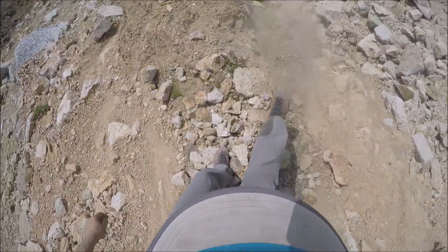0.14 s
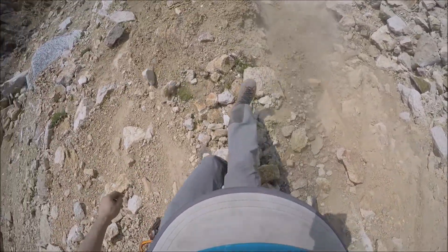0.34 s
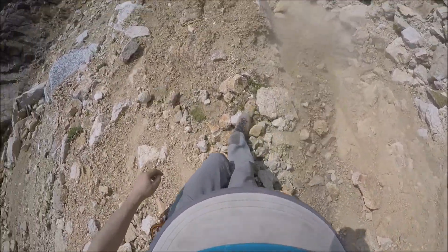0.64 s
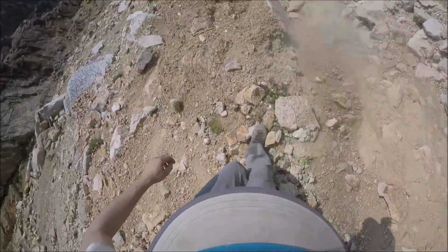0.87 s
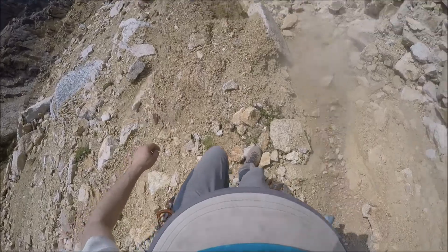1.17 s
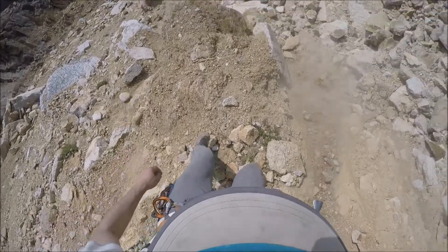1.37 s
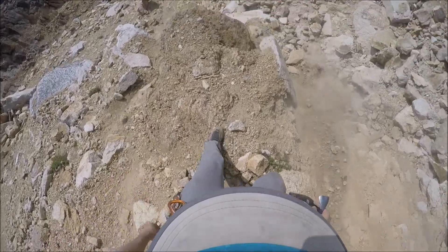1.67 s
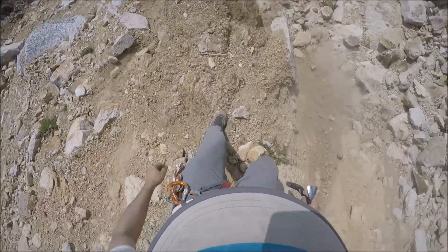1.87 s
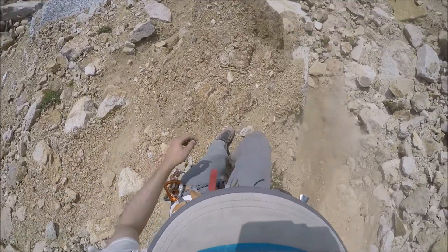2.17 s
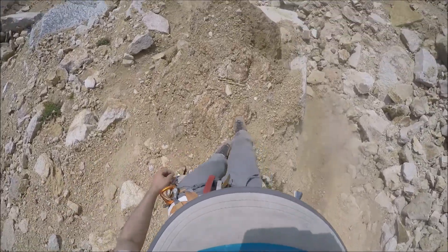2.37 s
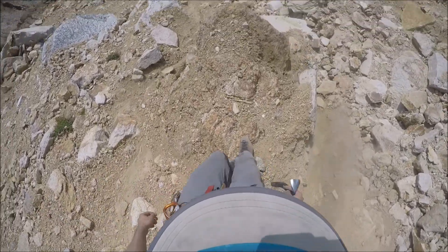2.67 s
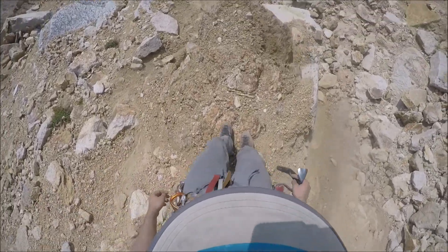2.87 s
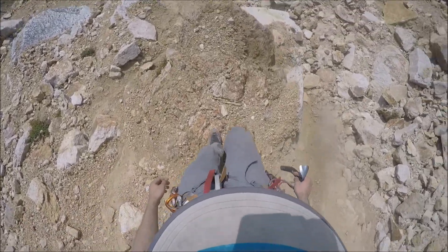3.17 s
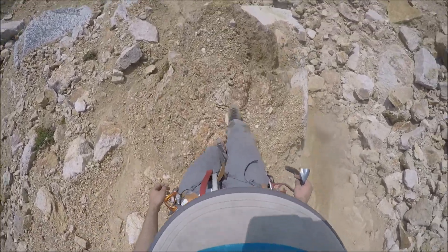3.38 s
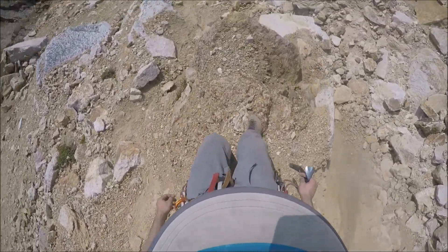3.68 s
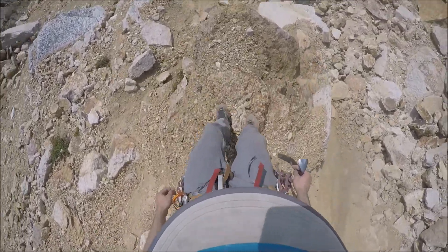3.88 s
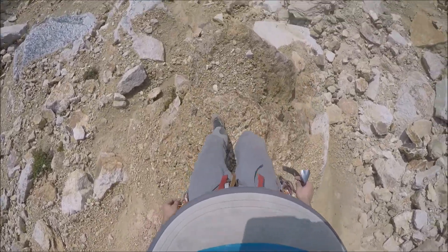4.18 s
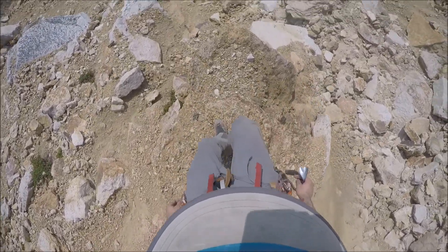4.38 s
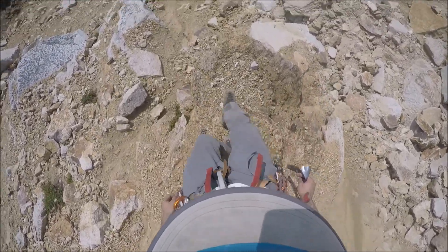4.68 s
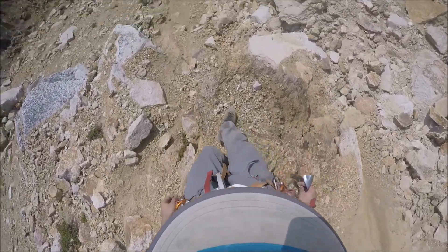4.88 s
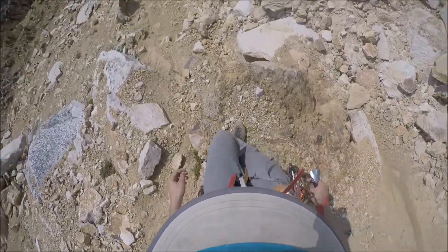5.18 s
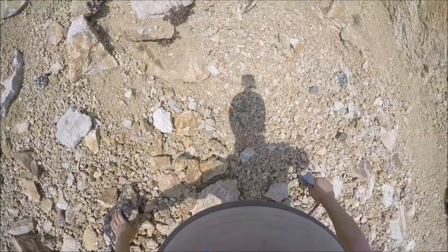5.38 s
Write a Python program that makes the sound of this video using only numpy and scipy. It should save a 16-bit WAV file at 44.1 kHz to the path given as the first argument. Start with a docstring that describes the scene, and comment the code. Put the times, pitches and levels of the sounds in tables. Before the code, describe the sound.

Loose stones rattle and skid under boots heading downhill, thinning to a soft trickle of grit amid low bumps and wind.

```python
"""On a steep slope of loose gravel, boots step and slide downhill.
Stones run, clack and skid under the soles, then settle into a thin trickle of grit as the ground
turns to soft dirt. It is all heard by a camera in a plastic case worn on the body:
heavy steps jolt it with dull thuds, and moving air rumbles on the case."""
import sys
import numpy as np
from scipy import signal
from scipy.fft import rfft, irfft
from scipy.io import wavfile
from scipy.ndimage import uniform_filter1d

SR = 44100
rng = np.random.default_rng(int(sys.argv[2]) if len(sys.argv) > 2 else 0)


def dump(signal):
    """Clip the signal to [-1, 1] and save it as 16-bit WAV at the path in sys.argv[1]."""
    limited = np.clip(np.atleast_2d(signal).T, -1, 1)
    pcm = np.round(limited * 32767).astype(np.int16)
    wavfile.write(sys.argv[1], SR, pcm)


N = 244302
TIME = np.arange(N) / SR


def from_db(db):
    return 10 ** (np.asarray(db) / 20)


def rms_one(x):
    """Scale a sound to an average (rms) level of 1."""
    return x / np.sqrt(np.mean(x ** 2) + 1e-20)


def peak_one(x):
    """Scale a hit so that its loudest 3 ms have level 1."""
    return x / np.sqrt(uniform_filter1d(x ** 2, SR * 3 // 1000).max())


def add(out, start_s, sound):
    """Mix a sound in at start_s."""
    start = int(np.clip(round(start_s * SR), 0, N - 1))
    out[start:start + len(sound)] += sound[:N - start]


def swell(peak_s, half_length_s):
    """A smooth rise to 1 and back."""
    return np.exp(-((TIME - peak_s) / half_length_s) ** 2 / 2)


def coloured(x, tone):
    """Shape a sound with a table of pitches and levels, fading beyond its ends; level 1."""
    hz, db = np.transpose(tone)
    log_hz = np.log(np.maximum(np.arange(N // 2 + 1) * SR / N, 1))
    outside = np.maximum(np.log(hz[0]) - log_hz, 0) + np.maximum(log_hz - np.log(hz[-1]), 0)
    gain = from_db(np.interp(log_hz, np.log(hz), db) - 29 * outside)
    return rms_one(irfft(rfft(x) * gain, N))


def filtered(x, order, hz, kind="band"):
    """Keep a band of pitches, or only the low ones."""
    return signal.sosfilt(signal.butter(order, hz, kind, fs=SR, output="sos"), x)


def resonance(x, hz, width_hz):
    """Ring at one pitch; the narrower the width, the longer the ring."""
    r = np.exp(-np.pi * width_hz / SR)
    feedback = [1, -2 * r * np.cos(2 * np.pi * hz / SR), r * r]
    return signal.lfilter((1 - r * r) / 2 * np.array([1, 0, -1]), feedback, x + 1e-18)


def hiss(db=0):
    """Smooth noise, like countless tiny hits blurred together."""
    return from_db(db) * rng.standard_normal(N)


def grains(per_s, spread_db, q, low_hz, high_hz, count=24):
    """Pebbles collide at random, mostly weakly, each at its own pitch; a higher q rings longer."""
    sizes = from_db(spread_db * np.minimum(rng.exponential(1, N), 4)) * rng.choice([-1, 1], N)
    clicks = sizes * (rng.random(N) < per_s / SR)
    pebble = rng.integers(0, count, N)
    pitches = np.geomspace(low_hz, min(high_hz, SR / 2), count)
    rings = sum(resonance(clicks * (pebble == k), hz, hz / q) for k, hz in enumerate(pitches))
    return rms_one(rings / np.sqrt(per_s))


def coarseness(first_share=.79, dirt_from_s=3.14, blend_s=.082):
    """The share of the ground that is coarse stones; it gives way to soft dirt."""
    return first_share / (1 + np.exp((TIME - dirt_from_s) / blend_s))


# The tone of running stones and of running dirt: pitch_hz, level_db
STONE_TONE = [(700, -9.5), (1100, -5.5), (1600, -11), (2350, -2), (2900, -5.5), (3800, -3), (4600, -14),
              (6500, -12.5), (7500, -36)]
DIRT_TONE = [(700, -8), (1000, -6), (1600, -14.5), (2100, -4), (2400, -3.5), (2800, 0), (3700, -3.5),
             (4500, -11.5), (6600, -15.5), (8000, -14.5)]
def rattle(hits_per_s, coarse):
    """Near pebbles and crumbs of dirt rattle over the smooth wash of far ones."""
    pebbles = grains(1.1 * hits_per_s, spread_db=4, q=6, low_hz=1072, high_hz=7320) + hiss(-1)
    crumbs = grains(4 * hits_per_s, spread_db=4.5, q=2.5, low_hz=1730, high_hz=8200) + hiss(6)
    stony = np.sqrt(coarse) * coloured(pebbles, STONE_TONE)
    return stony + np.sqrt(1 - coarse) * coloured(crumbs, DIRT_TONE)


# The tone of crushed ground: pitch_hz, level_db
CRUNCH_TONE = [(150, 12), (300, 6), (550, 1), (850, -7.5), (1150, -8.5), (1600, -6.5), (2400, -10)]
# Weight comes onto a boot (wind uses this too): peak_s, half_length_s, crunch_db, air_db
FOOTSTEPS = [(0.6, 0.12, -56, -68), (0.89, 0.2, -75, -36), (1.346, 0.046, -54, -51),
             (1.733, 0.22, -56.5, -33.5), (2.866, 0.022, -54, -33.5), (3.16, 0.13, -54.5, -35),
             (3.665, 0.09, -57.5, -33), (4.222, 0.13, -63, -37.5), (5.04, 0.32, -58.5, -36)]
def crunch(hits_per_s, coarse, flow_db):
    """Coarse stones crack under the sole; soft dirt only rustles."""
    trodden = sum(from_db(db) * swell(s, half) for s, half, db, _ in FOOTSTEPS)
    level = np.hypot(from_db(-59.5 + .26 * flow_db), trodden)
    cracks = grains(hits_per_s / 2, spread_db=6.5, q=2.4, low_hz=241, high_hz=1820)
    return level * coloured(coarse * cracks + hiss(7), CRUNCH_TONE)


# The tone of sliding sand: pitch_hz, level_db
SAND_TONE = [(3000, -24), (4700, -15), (7600, -2.5), (9200, -6.5), (10200, -6), (12000, -6), (14000, -10),
             (15300, -9)]
# Narrow peaks and a dip in its hiss: pitch_hz, width_hz, boost_db
SAND_BANDS = [(5080, 130, 12), (5380, 150, 12), (6560, 380, 9), (7750, 500, -5), (8420, 250, 3)]
def sand(hits_per_s, flow_db):
    """Fine grit hisses, louder when more gravel runs."""
    grit = grains(4 * hits_per_s, spread_db=4, q=2.7, low_hz=4000, high_hz=13900) + hiss(2)
    for hz, width_hz, db in SAND_BANDS:
        grit = grit + (from_db(db) - 1) * resonance(grit, hz, width_hz)
    return from_db(-57.5 + .54 * flow_db) * coloured(grit, SAND_TONE)


# How loudly the gravel runs (tumbling uses this too): time_s, level_db
GRAVEL_FLOW = [(0, -45.5), (.28, -43), (.55, -47.5), (.78, -49.5), (1.15, -50), (1.78, -49), (2.08, -53),
               (2.85, -56), (3.4, -59), (4.1, -61), (4.75, -59), (5.4, -62)]
def gravel(full_flow_db=-45, surge_db=1.99, surges_per_s=50):
    """The ground slides in small surges that lift rattle, crunch and sand together."""
    rattle_db = np.interp(TIME, *np.transpose(GRAVEL_FLOW))
    flow_db = rattle_db - full_flow_db
    hits_per_s = 2000 * from_db(.75 * flow_db)
    coarse = coarseness()
    wander = rms_one(np.interp(TIME * surges_per_s, np.arange(4096), rng.standard_normal(4096)))
    surge = from_db(surge_db * (.5 + .5 * coarse) * wander)
    running = from_db(rattle_db) * rattle(hits_per_s, coarse)
    return surge * (running + crunch(hits_per_s, coarse, flow_db) + sand(hits_per_s, flow_db))


# The tone of air swirling on the case: pitch_hz, level_db
WIND_TONE = [(16, 7), (28, 2.5), (50, 0), (80, -6.5), (120, -14.5), (190, -23.5), (400, -39.5)]
def wind(breeze_db=-40):
    """Air rumbles on the case: a light breeze, and a puff with every step."""
    puffs = sum(from_db(db) * swell(s, half) for s, half, _, db in FOOTSTEPS)
    swirls = coloured(hiss(), WIND_TONE)
    strength = np.sqrt(uniform_filter1d(swirls ** 2, size=SR // 5))
    return np.hypot(from_db(breeze_db), puffs) * swirls / strength


def hit(low_hz, high_hz, fade_s, chatter, ring, rebound, snap=0, bounces=1, count=7):
    """A hit and its bounces ring a stone: size sets the lowest pitch, hardness the highest."""
    t = np.arange(SR // 10) / SR
    force = chatter * rng.standard_normal(len(t)) * from_db(-60 * t / fade_s)
    force[0] += 1
    for k in range(bounces):
        bounce_s = .003 + .019 * (k + rng.random()) / bounces
        force[int(bounce_s * SR)] += rebound * rng.uniform(-1.2, 1.2)
    high_hz = max(high_hz, 1.2 * low_hz)
    crack = filtered(force, 2, (low_hz, high_hz))
    # an uneven stone rings at unevenly spaced pitches, muffled by the ground
    pitches = low_hz + (high_hz - low_hz) * (np.arange(count) + rng.random(count)) / count
    rings = sum(rng.choice([-1, 1]) * rng.uniform(.5, 1) * resonance(force, hz, width_hz=170)
                for hz in pitches)
    stone = filtered(rms_one(crack) + ring * rms_one(rings), 2, min(2 * high_hz, SR / 3), "low")
    # grit caught between the stones snaps
    grit = rms_one(filtered(force, 4, hz=(700, 5200)))
    return peak_one(stone + snap * grit)


def clear_ring(hz, fade_s=.022, contact_s=.0005):
    """A short clear ring set off by a stone's hit, often the case's own note."""
    t = np.arange(SR // 10) / SR
    note = np.sin(2 * np.pi * (hz * t + rng.random()))
    return peak_one(note * from_db(-60 * t / fade_s) * np.minimum(t / contact_s, 1))


# Larger stones hit each other: start_s, level_db, low_hz, high_hz, ring_hz
STONE_HITS = [(.005, -37, 1000, 1600, 1200), (.033, -38, 2000, 3600, 2400), (.1262, -26, 1900, 2650, 2340),
              (.142, -35, 2100, 3000, 2360), (.185, -36.5, 2230, 3300, 2360),
              (.1974, -36.5, 2150, 3700, 2400), (.224, -41, 800, 1300, 1000),
              (.2315, -39, 3100, 5200, 3650), (.2594, -38, 2700, 4500, 3100),
              (.2654, -39, 3100, 5200, 3800), (.315, -29.5, 2100, 3200, 2380),
              (.3614, -38, 2200, 3900, 2950), (.4274, -38, 2150, 2600, 2360), (.531, -36, 2000, 2800, 2330),
              (.5511, -39, 2800, 4600, 3600), (.6794, -38, 2200, 3500, 2900),
              (.7861, -44, 1400, 2800, 2330), (.836, -41, 1900, 3600, 3600), (.85, -36, 1200, 2700, 2340),
              (.877, -42, 1900, 3800, 2380), (.972, -35, 2350, 3700, 2270), (1.0241, -39, 2200, 3500, 2310),
              (1.0604, -35, 2400, 3800, 3600), (1.0953, -36, 2300, 4000, 3630),
              (1.294, -35.5, 2360, 4500, 3300), (1.331, -37, 2200, 3200, 2360),
              (1.363, -32.5, 1300, 2600, 2360), (1.3917, -42.5, 1200, 3000, 1510),
              (1.423, -31, 1900, 3750, 3250), (1.4364, -41, 1900, 3100, 2500),
              (1.4454, -40, 1750, 2700, 1830), (1.533, -37, 2230, 4000, 2630),
              (1.6067, -40, 2500, 3900, 2920), (1.7267, -35.5, 1770, 3570, 3150),
              (2.143, -40, 1400, 2600, 1930), (2.269, -35, 1050, 2600, 1720),
              (2.2735, -37, 1140, 3300, 1200), (2.2825, -33, 1400, 2900, 2370),
              (2.33, -38, 1300, 2400, 1540), (2.4261, -33, 1200, 3000, 2380),
              (2.4583, -44, 1900, 3800, 1830), (2.5975, -36, 1050, 2800, 1205),
              (2.6738, -45.5, 1500, 3400, 2570), (2.729, -43.5, 1400, 3900, 2370),
              (2.7586, -37, 1700, 2650, 2370), (2.827, -41.5, 1400, 3770, 2890),
              (2.864, -43.5, 1100, 3100, 1205), (2.9607, -48, 2600, 3700, 3200),
              (2.9841, -45.5, 2400, 3700, 3130), (3.1618, -45, 1000, 2600, 1080),
              (3.1753, -39.5, 2300, 4500, 2930), (3.2256, -47.5, 2200, 3500, 3210),
              (3.458, -48, 2400, 6200, 3810), (3.8798, -46.5, 950, 2800, 2670),
              (4.603, -52, 2800, 6000, 2990), (4.7351, -47, 2500, 3400, 2550),
              (4.7742, -43, 2370, 4000, 3430)]
def clacks(boost_db=.2, equal_db=-16):
    """Stones crack together and set off a short ring, often in the case; harder hits ring more."""
    out = np.zeros(N)
    for start_s, db, low_hz, high_hz, ring_hz in STONE_HITS:
        crack = hit(low_hz, high_hz, fade_s=.019, chatter=.17, ring=.4, rebound=.45, snap=.25, bounces=2)
        note = from_db(.4 * (db - equal_db)) * clear_ring(ring_hz)  # as loud as the crack at equal_db
        add(out, start_s, from_db(db + boost_db) * peak_one(crack + note))
    return out


# The tone of the case rubbing its strap: pitch_hz, level_db
STRAP_TONE = [(60, -7), (150, -38), (300, -28)]
# Jolts of the body: peak_s, level_db, pitch_hz
JOLTS = [(0.026, -31.5, 80.4), (1.637, -39, 111), (1.751, -19.5, 52.3), (1.832, -24.5, 37),
         (1.859, -21.5, 112), (2.422, -31.5, 79), (2.566, -25, 43.5), (3.093, -23, 56), (3.155, -22.5, 28),
         (3.204, -30.5, 73.6), (3.661, -17.5, 53.7), (4.238, -19, 23.6), (4.355, -21.5, 89),
         (5.005, -24, 42)]
def thuds(half_length_cycles=.675, slowing=.284, rub_db=-31):
    """Each jolt sways the case for a cycle or two, slowing as it goes, and rubs it on its strap."""
    out = np.zeros(N)
    rub = from_db(rub_db) * coloured(hiss(), STRAP_TONE)
    for peak_s, db, hz in JOLTS:
        from_peak = (TIME - peak_s) * hz / half_length_cycles
        near = np.abs(from_peak) < 5
        from_peak = from_peak[near]
        turns = np.cumsum(hz * (1 - slowing * np.tanh(from_peak))) / SR + rng.random()
        sway = np.exp(-from_peak ** 2 / 2) * np.sin(2 * np.pi * turns)
        out[near] += from_db(db) * (sway + np.exp(-from_peak ** 2 / 5) * rub[near])
    return out


def tumbling(count=26, low_hz=1600, high_hz=3400, spread_db=3):
    """Small loose stones tick at random, more often and harder the more gravel runs."""
    out = np.zeros(N)
    rattle_db = np.interp(TIME, *np.transpose(GRAVEL_FLOW))
    slid_so_far = np.cumsum(from_db(rattle_db / 2) * coarseness())
    for k, (when, pitch, force) in enumerate(rng.random((count, 3))):
        at = min(np.searchsorted(slid_so_far, slid_so_far[-1] * (k + when) / count), N - 1)
        hz = low_hz * (high_hz / low_hz) ** pitch
        tick = hit(hz / 2 ** .5, hz * 2 ** .5, fade_s=.016, chatter=.14, ring=.5, rebound=.35)
        add(out, at / SR, from_db(rattle_db[at] - 1 + spread_db * force) * tick)
    return out


# A boot strikes a big rock: start_s, level_db, low_hz, high_hz, sole_db
ROCK_HITS = [(0.1181, -26, 480, 870, -36.5), (1.007, -39, 330, 1060, -40.5),
             (1.341, -39.5, 514, 1250, -44.5), (1.849, -32, 850, 2980, -34.5), (2.052, -44, 480, 1160, -57),
             (2.082, -42.5, 935, 1630, -50), (2.214, -33, 540, 1590, -38.5),
             (2.4039, -38.5, 483, 2440, -42), (4.345, -53, 480, 1500, -43.5)]
def knocks(boost_db=1.5, ring_db=-14, ring_hz=1090):
    """A big rock knocks once, low and dry, with a faint ring, over the soft thump of the sole."""
    out = np.zeros(N)
    for start_s, db, low_hz, high_hz, sole_db in ROCK_HITS:
        rock = hit(low_hz, high_hz, fade_s=.016, chatter=.09, ring=.2, rebound=0, snap=.2)
        sole = hit(low_hz=150, high_hz=420, fade_s=.03, chatter=.07, ring=0, rebound=0)
        rock += from_db(ring_db) * clear_ring(ring_hz)
        add(out, start_s, from_db(db + boost_db) * rock + from_db(sole_db) * sole)
    return out


# A sole grinds into the ground: peak_s, level_db, half_length_s
SOLE_GRINDS = [(0.58, -48.5, 0.011), (1.567, -52, 0.023), (3.68, -57.5, 0.023), (4.342, -61.5, 0.011),
               (5.013, -57.5, 0.026), (5.526, -54.5, 0.0062)]
def scuffs():
    """Crumbs of dirt burst while the weight comes onto a boot."""
    pressure = sum(from_db(db) * swell(s, half) for s, db, half in SOLE_GRINDS)
    crumbs = grains(per_s=1500, spread_db=6, q=.88, low_hz=298, high_hz=3100)
    return pressure * rms_one(resonance(crumbs, hz=520, width_hz=1500))


# Skidding stones: start_s, level_db, pitch_hz
STONE_SKIDS = [(1.108, -41, 4060), (1.206, -43, 1140), (2.131, -40, 2500), (2.315, -45.5, 4200),
               (4.485, -52, 2220)]
def skids(span=1.43):
    """A stone bounces quickly over others in a short rasp."""
    out = np.zeros(N)
    for start_s, db, hz in STONE_SKIDS:
        rasp = hit(hz / span, hz * span, fade_s=.09, chatter=.15, ring=.35, rebound=1.6, snap=.6,
                   bounces=5)
        add(out, start_s, from_db(db) * rasp)
    return out


def hush(start_s=5.4, fade_s=.041, drop_db=-6):
    """The level drops suddenly near the end."""
    return from_db(drop_db * np.clip((TIME - start_s) / fade_s, 0, 1))


def scene():
    """The sliding ground and the wind, with single hits on top, in one channel."""
    background = hush() * (gravel() + wind() + tumbling())
    return (background + clacks() + thuds() + knocks() + scuffs() + skids())[None]


# Pitches the plastic case lifts or dulls: pitch_hz, width_hz, boost_db
CASE_BANDS = [(1150, 190, 4.5), (1400, 90, -4), (1510, 80, 5), (1650, 110, -5), (1870, 140, 2),
              (2030, 70, -4), (2150, 70, 2), (2360, 100, 6), (2490, 80, -3), (2770, 130, -1.5),
              (2960, 100, 2), (3110, 120, -3), (3620, 120, 2), (4370, 110, -6), (4490, 110, 3),
              (5020, 150, 2.5), (6400, 900, 2), (7600, 1100, -6), (9200, 400, 3)]
def record(dry, cutoff_hz=15400):
    """The case colours everything with its own ring; the highest treble is cut."""
    for hz, width_hz, db in CASE_BANDS:
        dry = dry + (from_db(db) - 1) * resonance(dry, hz, width_hz)
    return signal.sosfilt(signal.ellip(12, .1, 80, cutoff_hz, fs=SR, output="sos"), dry)


dry = scene()
out = record(dry)
dump(out)
```